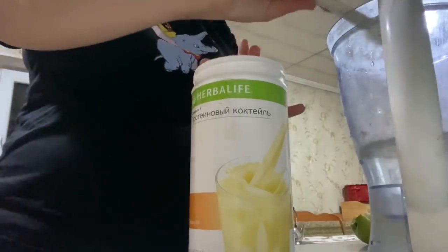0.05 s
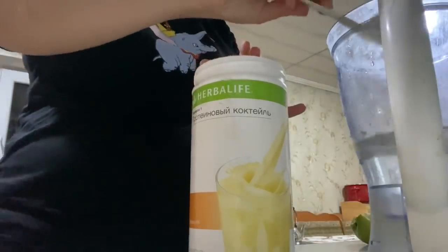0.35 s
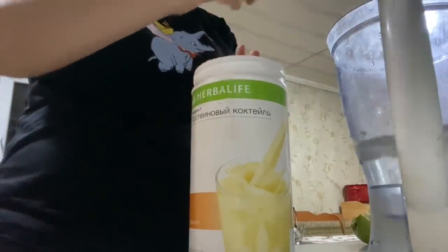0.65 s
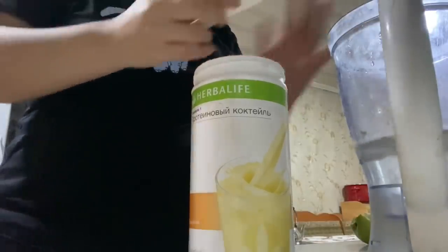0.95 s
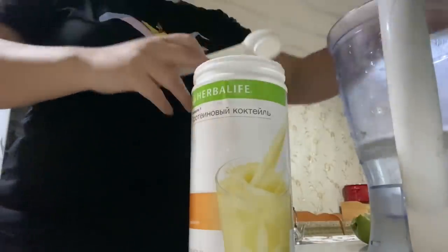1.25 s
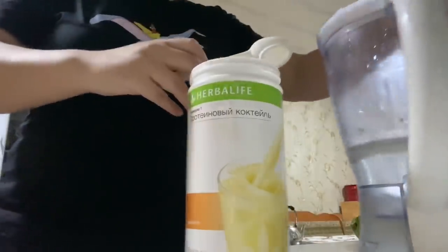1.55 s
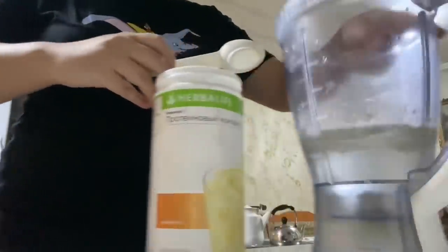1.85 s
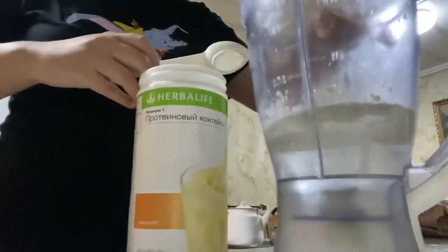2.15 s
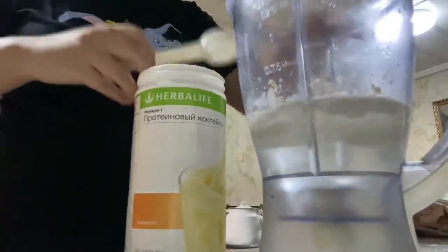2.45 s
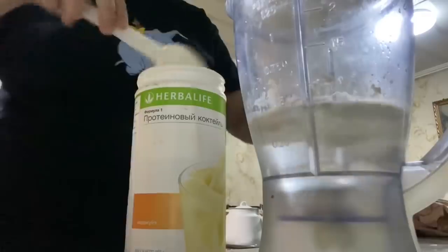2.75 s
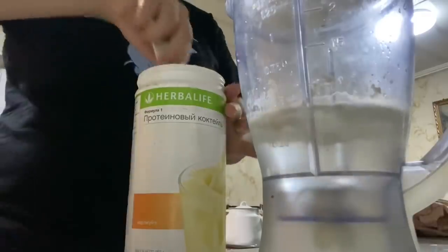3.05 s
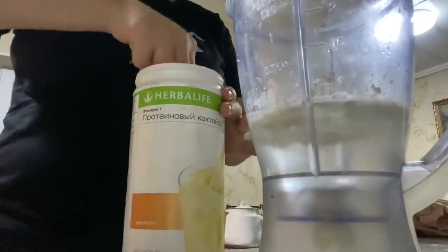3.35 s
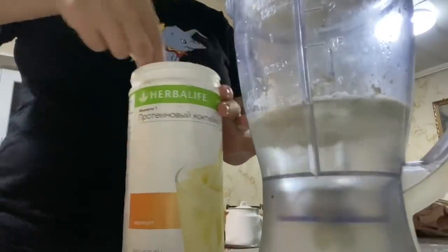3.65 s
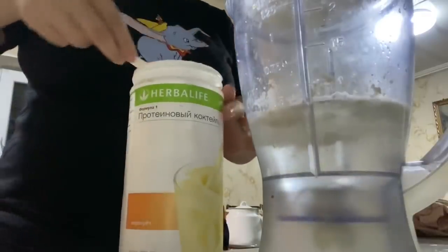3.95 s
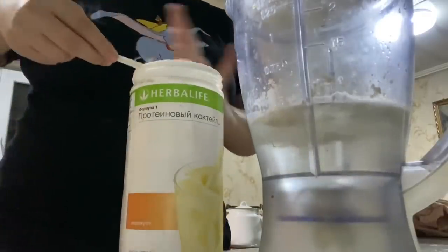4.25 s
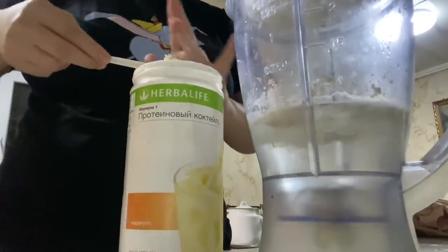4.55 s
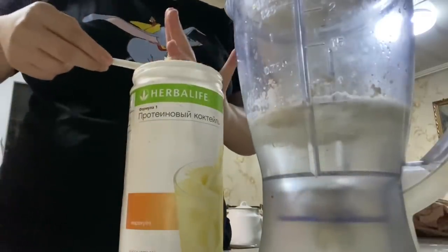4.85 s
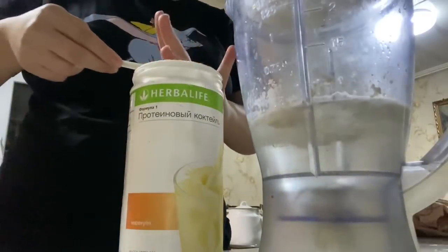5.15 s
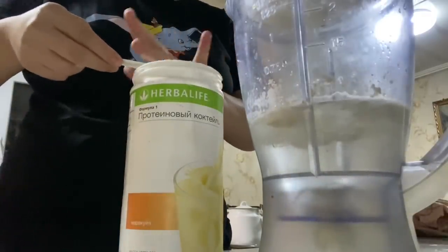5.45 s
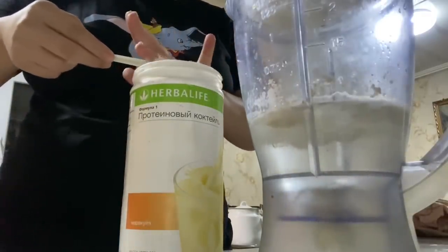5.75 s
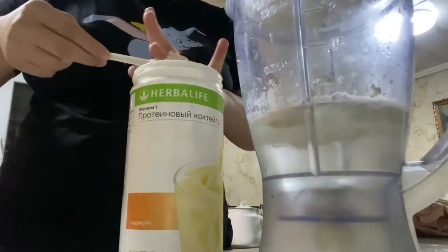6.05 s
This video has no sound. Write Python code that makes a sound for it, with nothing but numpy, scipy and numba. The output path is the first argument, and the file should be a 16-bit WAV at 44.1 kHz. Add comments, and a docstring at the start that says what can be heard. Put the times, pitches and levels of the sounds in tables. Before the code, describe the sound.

A low appliance hum and soft room noise run throughout in a small kitchen, with the microphone close by. Right at the start a plastic scoop taps twice on a blender jug, then scrapes lightly along a rim. A nudged tub judders briefly from about 0.6 to 1 second, with soft finger rubs on plastic. At 1.3 seconds a hand knocks loudly against the jug, and the blender slides over the table until 2.4, rumbling and rasping on grit with a couple of smaller knocks. Around 2.7 and 3 seconds the scoop knocks and clacks inside the hollow tub, then digs through crunching powder, rubbing the wall. At 3.7 the tub thumps down heavily, shaking the table. From 4 seconds it is much quieter: faint finger rubs, small ticks around 4.5 and 5, and light scrapes of the scoop's edge on the rim until about 6 seconds.

```python
"""Making a shake at a kitchen table, a microphone standing close by. An appliance hums in a small room.
Fingers rub plastic, a scoop taps twice on a blender jug and scrapes a rim, and a nudged tub judders.
The blender is grasped and slid nearer, rasping over grit. The scoop knocks into the tub and digs through
crunching powder, then the tub thumps down. Last, a finger levels the scoop and its edge grazes a rim.
Every blow rings the thing it hits and shakes the table."""
import sys
import numpy as np
from scipy import signal
from scipy.fft import rfft, irfft, next_fast_len
from scipy.io import wavfile
from numba import njit

SR = 44100
rng = np.random.default_rng(int(sys.argv[2]) if len(sys.argv) > 2 else 0)


def wav_out(sig):
    """Save sig, one row per channel (or a flat mono array), as 16-bit PCM at SR to the path in sys.argv[1]."""
    wavfile.write(sys.argv[1], SR, np.round(np.clip(np.atleast_2d(sig).T, -1, 1) * 32767).astype(np.int16))


N = 269509
TIME, PADDED = np.arange(N) / SR, next_fast_len(N)

# room tone: pitch_hz, density_db
AIR_TONE = [(15, -49.5), (25, -8), (69, -11), (90, -10), (224, -16), (301, -9), (373, -10.5), (438, -23.5),
            (540, -24.5), (1210, -38), (1500, -43), (2020, -41.5), (2780, -46), (15000, -55)]
# appliance hum: pitch_hz, level_db
HUM_PARTIALS = [(99.5, -62.5), (308, -67)]

# fingers and handle rubbing the outside of the plastic: start_s, length_s, level_db
FINGER_RUBS = [(-.02, 0.048, -48), (0.409, 0.26, -62), (0.984, 0.062, -54), (1.26, 0.37, -65),
               (3.215, 0.042, -54), (3.982, 0.11, -59), (4.133, 0.38, -77), (4.986, 0.037, -61.5),
               (5.987, 0.051, -53.5)]
# the scoop's edge drawn along a rim: start_s, length_s, level_db, brightness_hz
EDGE_SCRAPES = [(0.377, 0.24, -54.5, 15000), (0.836, 0.12, -69, 15000), (5.068, 0.035, -55, 4500),
                (5.636, 0.21, -64, 14000), (5.795, 0.15, -61, 7800), (5.999, .12, -56.5, 5000)]
# hits: start_s, level_db, brightness_hz, table_thud_db
RIM_TAPS = [(.1375, -27.5, 8850, -28.5), (.2775, -21, 8400, -27.5)]
SCOOP_CLICKS = [(2.783, -46.5, 6000, -59), (.644, -50, 12000, -71), (2.769, -45, 5850, -53),
                (2.9925, -43, 11700, -56), (3.003, -38, 12000, -45), (3.7255, -25.5, 15000, -54),
                (4.087, -56, 6000, -64)]
JUG_KNOCKS = [(1.3228, -10.5, 905, -52), (1.3265, -6, 963, -26), (1.341, -26, 499, -27),
              (1.849, -16.5, 1100, -57), (2.194, -23, 3000, -61.5), (2.427, -35.5, 5050, -33.5)]
TUB_KNOCKS = [(2.7428, -13, 3480, -35), (2.7565, -27, 5000, -30), (2.7825, -34, 4950, -35),
              (3.7278, -7.5, 280, -2.5)]
BOWL_DROPS = [(2.9928, -11.5, 4930, -52), (3.172, -46, 500, -31), (4.516, -53, 4010, -74),
              (4.9996, -53, 1496, -67), (6.001, -61, 1500, -59)]
# speed curve of the sliding blender: time_s, speed_db
SLIDE_SPEED = [(1.2, -94), (1.237, -67), (1.33, -62.5), (1.39, -54), (1.468, -42.5), (1.525, -45.5),
               (1.66, -37.5), (1.76, -43), (2.025, -35), (2.2, -40), (2.338, -51), (2.428, -73.5),
               (2.499, -106)]
# coarse grains crushed under a blender foot: start_s, length_s, level_db
FOOT_CRUNCHES = [(1.63, 0.0098, -43.5), (1.68, 0.014, -45.5), (2.405, 0.013, -57.5)]
# the scoop moving in the tub: start_s, length_s, powder_db, crunch_hz, wall_rub_db
DIGS = [(2.552, 0.08, -66.5, 12300, -72), (2.726, 0.046, -72, 6760, -46.5),
        (2.805, 0.295, -83, 2410, -57.5), (2.977, 0.062, -41.5, 4400, -43.5),
        (3.055, 0.12, -71, 3540, -58.5), (3.135, 0.45, -72.5, 2060, -55),
        (3.359, 0.11, -54.5, 12500, -69.5), (3.467, 0.084, -49.5, 2770, -47.5),
        (3.601, 0.15, -49, 2050, -49), (3.704, 0.1, -43.5, 4500, -46)]

# ringing modes of each struck thing: pitch_hz, level_db, t60_s
TABLE_MODES = [(64.4, -2, 0.38), (74.8, 2, 0.25), (132.4, 2.5, 0.19), (208.5, -8, 0.19), (313, -6, 0.077)]
RIM_MODES = [(160, -5.5, 0.23), (322.8, 2, 0.22), (898, 13.5, 0.055), (1674, -1.5, 0.07), (2467, 5.5, 0.05),
             (3294, -1, 0.057), (3300, -4, 0.19), (4410, -22.5, 0.1)]
SCOOP_MODES = [(4740, -14, 0.025), (6920, -1.5, 0.021), (8140, 3, 0.016), (11900, 2.5, 0.011)]
JUG_MODES = [(126, 1, 0.1), (214, -4.5, 0.11), (316, 0, 0.055), (360, 2, 0.11), (600, 0.5, 0.099),
             (877, -2.5, 0.051)]
TUB_MODES = [(388, 11.5, 0.047), (455, 6, 0.057), (671, -16.5, 0.0306), (1083, 8, 0.025),
             (1990, -6.5, 0.025)]
BOWL_MODES = [(525, -2, 0.051), (619, 4, 0.036), (1018, 1.5, 0.016), (1810, -9, 0.024), (2160, -9.5, 0.03),
              (3200, -10, 0.016)]
# the crowd of weaker modes between them, played as noise: pitch_hz, density_db
RIM_CROWD = [(60, 4), (350, 6), (600, -2), (1350, -15.5), (3100, 4), (4500, -5.5), (6000, -10),
             (14000, -26.5)]
SCOOP_CROWD = [(300, 12), (2000, -0.5), (6000, -5.5), (8300, 3), (14000, -14.5)]
JUG_CROWD = [(60, -26.5), (150, 19.5), (600, 18), (1200, -7), (2200, 9.5), (14000, -12)]
TUB_CROWD = [(40, -14), (250, 5.5), (550, 14), (1100, -1), (1450, -15), (2200, -8), (5000, -30.5),
             (14000, -45)]

# tone colour of each friction layer: pitch_hz, density_db
FINGER_TONE = [(200, 4.5), (550, 2), (900, 3), (1550, -7), (2300, -7.5), (3200, -15), (5500, -22),
               (14000, -41.5)]
SCRAPE_TONE = [(600, 10.5), (1200, -7.5), (3400, -4.5), (5700, -19.5), (7000, -9), (12000, -17),
               (15000, -11)]
JUDDER_TONE = [(40, -4), (100, 3), (132, 12), (170, -4), (200, -5), (250, -12.5), (620, -19), (900, -54),
               (3000, -69)]
RUMBLE_TONE = [(40, -19.5), (65, -4), (200, -3), (340, -4), (700, -28)]
CHATTER_TONE = [(200, -25.5), (400, -7), (650, -0.5), (900, -6.5), (1200, -9), (1500, -18), (3000, -33.5)]
RASP_TONE = [(700, -20), (1500, -6), (2000, -1), (3800, -1), (5000, -3), (7000, -69)]
GRIT_TONE = [(2500, -13), (4700, 2.5), (6000, 1.5), (7200, 0.5), (9000, -3), (12000, -9.5), (15500, -13.5)]
POWDER_TONE = [(800, -14), (2000, 5.5), (3500, 3.5), (4800, 2), (6200, 0), (8300, -0.5), (13000, -8.5),
               (15500, -13)]
WALL_TONE = [(100, -19), (300, 4), (520, 3), (750, -0.5), (1100, -6.5), (1500, -14.5), (2200, -14.5),
             (3200, -16.5), (5000, -24), (10000, -81)]
PUSH_TONE = [(30, -27.5), (48, 5.5), (70, 8), (105, -1.5), (155, 2), (300, -23), (900, -55)]
# resonances of rubbed things: pitch_hz, width_hz, lift_db
FINGER_PEAKS = [(1200, 85, 2.3), (2245, 150, 4)]
EDGE_PEAKS = [(2170, 41, 8.7), (2965, 60, 7.1), (4010, 160, 10.5), (4950, 190, 13.3)]
BASE_PEAKS = [(607, 9.5, 7), (716, 22, 7.8), (1168, 50, 7.7)]
BACK_FEET_PEAKS = [(3420, 120, 6), (6060, 61, 7.4)]
FRONT_FEET_PEAKS = [(1270, 23, 10.5), (1830, 79, 7.1), (2300, 45, 6.7), (4900, 250, 3)]
WALL_PEAKS = [(515, 77, 5.5)]

# the room's reverb time: pitch_hz, t60_s
ROOM_DECAY = [(60, 0.58), (300, 0.41), (700, 0.2), (2000, 0.74), (5000, 0.077), (14000, 0.068)]
# balance of the microphone's two ports: pitch_hz, left_minus_right_db
PORT_BALANCE = [(60, -3.5), (200, -6.5), (380, -6), (700, -3.5), (1290, -1), (15000, 1)]
# how far both ports hear the same wave: pitch_hz, likeness_0_to_1
PORT_LIKENESS = [(3000, 0.01), (6200, 0.17), (7600, 1)]


def amp(db):
    """Decibels to gain."""
    return np.exp(np.asarray(db) * np.log(10) / 20)


def unit(x):
    """Scale to rms 1."""
    return x / np.sqrt(np.mean(x ** 2))


def pan(db):
    """Gains of the two ports for a left-minus-right level."""
    return amp(np.outer([1, -1], db) / 2)


def freqs(x):
    """Frequency of each Fourier bin of x."""
    return np.maximum(np.fft.rfftfreq(x.shape[-1], 1 / SR), 1)


def at(points, hz):
    """Read (Hz, value) points on a log-frequency axis."""
    point_hz, value = np.transpose(points)
    return np.interp(np.log(hz), np.log(point_hz), value)


def colour(x, tone):
    """EQ to a tone curve, rolled off below hearing; rms 1."""
    hz = freqs(x)
    return unit(irfft(rfft(x) * amp(at(tone, hz)) * hz ** 2 / (hz ** 2 + 20 ** 2), x.shape[-1]))


def soften(x, brightness_hz, order):
    """A softer contact takes off the treble."""
    return signal.lfilter(*signal.butter(order, brightness_hz, fs=SR), x)


def noise(size, alike_hz=260):
    """Noise at two microphone ports: alike in the bass, unrelated in the treble."""
    mid, side = rfft(rng.standard_normal((2, size)))
    alike = 0.68 / (1 + (np.fft.rfftfreq(size, 1 / SR) / alike_hz) ** 2)
    ports = mid * np.sqrt(1 + alike) + np.outer([1, -1], side * np.sqrt(1 - alike))
    return irfft(ports, size) / np.sqrt(2)


def walk(rate_hz):
    """Smooth random modulation with a spread near 1."""
    knots = rng.standard_normal(N // 20)
    return 1.1 * np.interp(TIME * rate_hz, np.arange(len(knots)), knots)


def stroke(start, length, attack_s, release_s):
    """Envelope of one movement: it swells smoothly, holds, then falls 60 dB in the release time."""
    speed = np.zeros(N)
    moving = (TIME > start) & (TIME < start + length + 2 * release_s)
    t = TIME[moving] - start
    swell = np.sin(np.minimum(t / attack_s, 1) * np.pi / 2) ** 2
    speed[moving] = swell * amp(-60 * np.maximum(t - length, 0) / release_s)
    return speed


def friction(tone, slip_db, grain_db):
    """Dense tiny catches, bunched by uneven slipping, ringing a body."""
    catches = noise(PADDED)
    catches[:, :N] *= amp(slip_db * walk(60) + grain_db * walk(1500))
    return colour(catches, tone)[:, :N]


@njit
def band_pass(x, hz, width_hz):
    """A resonance whose centre may move every sample; gain 1 at the centre."""
    y = np.empty_like(x)
    for port in range(len(x)):
        band, low = 0., 0.
        for i in range(len(hz)):
            tuning, damping = np.tan(np.pi * hz[i] / SR), width_hz / hz[i]
            swing = (band + tuning * (x[port, i] - low)) / (1 + tuning * (tuning + damping))
            band, low = 2 * swing - band, low + 2 * tuning * swing
            y[port, i] = damping * swing
    return y


def resonate(x, peaks, sway_db, drift, moves_per_s=11):
    """Add resonances that swell and shift in pitch as the point of contact moves."""
    out = x = np.ascontiguousarray(x)
    for hz, width_hz, lift_db in peaks:
        centre_hz = hz * (1 + drift * walk(moves_per_s))
        boost = amp(lift_db + sway_db * walk(moves_per_s)) - 1
        out = out + boost * band_pass(x, centre_hz, float(width_hz))
    return out


def ring(modes, t, rise_cycles, lag_s):
    """Damped modes that build up quickly and reach the left port a little later."""
    t = np.maximum(t - np.array([[lag_s], [0]]), 0)
    out = 0
    for hz, db, t60 in modes:
        rise = 1 - np.exp(-t * hz / rise_cycles)
        out = out + amp(db - 60 * t / t60) * np.sin(2 * np.pi * hz * t) * rise
    return out / np.sqrt(2 * sum(amp(db) ** 2 for _, db, _ in modes))


def strike(hits, modes, crowd, crowd_db, crowd_t60, rise_cycles, lag_s, order=1, pan_db=0):
    """Each hit rings an object's modes over a burst of noise and thuds the table."""
    size = SR // 2
    out, t = np.zeros((2, N + size)), np.arange(size) / SR
    thud = ring(TABLE_MODES, t, rise_cycles=0.53, lag_s=0.00084)
    tones = ring(modes, t, rise_cycles, lag_s)
    for start_s, db, brightness_hz, thud_db in hits:
        burst = colour(noise(size, alike_hz=702), crowd) * amp(crowd_db - 60 * t / crowd_t60)
        body = soften(tones + burst, brightness_hz, order)
        start = int(start_s * SR)
        out[:, start:start + size] += amp(db) * pan(pan_db) * body + amp(thud_db) * thud
    return out[:, :N]


def kitchen(air_db=-57):
    """A bed of steady air noise and the wavering hum of an appliance."""
    hum = 0
    for hz, db in HUM_PARTIALS:
        level = np.sqrt(2) * amp(db + 1.4 * walk(8.6))
        cycles = np.cumsum(hz * (1 + 0.0066 * walk(11))) / SR
        hum = hum + level * np.sin(2 * np.pi * cycles)
    return amp(air_db) * colour(noise(PADDED), AIR_TONE)[:, :N] + hum


def finger_rubs():
    """Fingers catch and slip on the plastic in soft, dull strokes."""
    skin = friction(FINGER_TONE, slip_db=2.5, grain_db=3)
    rub = resonate(skin, FINGER_PEAKS, sway_db=1.5, drift=.03)
    return rub * sum(amp(db) * stroke(start, length, attack_s=0.018, release_s=0.33)
                     for start, length, db in FINGER_RUBS)


def rim_taps():
    """The scoop taps the jug's rim, which rings on briefly."""
    return strike(RIM_TAPS, RIM_MODES, RIM_CROWD,
                  crowd_db=-7.5, crowd_t60=0.17, rise_cycles=1, lag_s=.00004)


def edge_scrapes():
    """The scoop's edge rings as it is drawn along a rim; some scrapes are bright, others dull."""
    catches = friction(SCRAPE_TONE, slip_db=1.5, grain_db=2.5)
    edge = resonate(catches, EDGE_PEAKS, sway_db=2, drift=.015)
    out = 0
    for start, length, db, brightness_hz in EDGE_SCRAPES:
        draw = stroke(start, length, attack_s=0.061, release_s=0.15)
        out = out + amp(db) * draw * soften(edge, brightness_hz, order=2)
    return out


def tub_judder(start_s=0.62, length_s=0.36, slip_hz=160, sag_hz_per_s=170, db=-33.5, fade_db_per_s=40):
    """The nudged tub's foot sticks and slips in a quick ragged train that slows and fades."""
    since = np.clip(TIME - start_s, 0, length_s)
    rate_hz = (slip_hz - sag_hz_per_s * since) * np.exp(.25 * walk(130))
    slip_count = np.floor(np.cumsum(rate_hz) / SR)
    slips = np.diff(slip_count, prepend=0) * amp(3 * walk(120))
    fade = amp(db - fade_db_per_s * since)
    nudge = stroke(start_s, length_s, attack_s=0.085, release_s=0.2)
    return colour(unit(slips) + noise(PADDED)[:, :N], JUDDER_TONE) * fade * nudge


def scoop_clicks():
    """The scoop's high modes die at once: small, bright plastic ticks."""
    return strike(SCOOP_CLICKS, SCOOP_MODES, SCOOP_CROWD,
                  crowd_db=-0.5, crowd_t60=0.04, rise_cycles=0.42, lag_s=.00001)


def blender_slide(layer_db=-38.5, rasp_db=-40, full_speed_db=-35, nearing_db_per_s=6.5, middle_s=1.78,
                  turn_middle_s=1.85, turn_length_s=0.31):
    """The base drags over the table: its feet rumble, chatter, rasp and hiss on grit as speed rises."""
    speed = amp(np.interp(TIME, *np.transpose(SLIDE_SPEED), left=-200, right=-200) - full_speed_db)
    nearing_db = nearing_db_per_s * (np.minimum(TIME, SLIDE_SPEED[-1][0]) - middle_s)
    rumble = friction(RUMBLE_TONE, slip_db=2, grain_db=0) * amp(layer_db)
    chatter = friction(CHATTER_TONE, slip_db=2.5, grain_db=5.5) * amp(layer_db + nearing_db)
    # grit follows the speed in full; body and rasp grow more slowly
    body = (rumble + chatter) * speed ** 0.59 * pan(-1)
    crunch = sum(amp(db) * stroke(start, length, attack_s=0.0094, release_s=0.15)
                 for start, length, db in FOOT_CRUNCHES)
    rasp = friction(RASP_TONE, slip_db=1.8, grain_db=4.2) * np.hypot(speed ** 0.79 * amp(rasp_db), crunch)
    grit = friction(GRIT_TONE, slip_db=1, grain_db=1.5) * speed * amp(layer_db)
    base = resonate(body + rasp + grit, BASE_PEAKS, sway_db=2, drift=.025)
    # the base turns as it is pulled: its weight crossfades from the back feet to the front
    back = resonate(base, BACK_FEET_PEAKS, sway_db=2.5, drift=.015)
    front = resonate(base, FRONT_FEET_PEAKS, sway_db=2.5, drift=.015)
    turned = np.clip(.5 + (TIME - turn_middle_s) / turn_length_s, 0, 1)
    return (1 - turned) * back + turned * front


def jug_knocks():
    """A hand bumps the jug and wakes its low modes."""
    return strike(JUG_KNOCKS, JUG_MODES, JUG_CROWD,
                  crowd_db=-10, crowd_t60=0.042, rise_cycles=0.99, lag_s=0.00042, order=2)


def scooping(crunch_q=3.3, crunch_lift_db=9.5, push_lift_db=4):
    """The scoop rubs the hollow tub, packed powder crunches at each dig's pitch, and the push rumbles."""
    grains = friction(POWDER_TONE, slip_db=2.4, grain_db=4.4)
    powder = wall_gain = push_gain = 0
    for start, length, powder_db, crunch_hz, wall_db in DIGS:
        swell_s = 0.61 * length
        dig = stroke(start, length, swell_s, release_s=0.21)
        crunch = signal.lfilter(*signal.iirpeak(crunch_hz, crunch_q, fs=SR), grains)
        powder = powder + amp(powder_db) * dig * unit(grains + (amp(crunch_lift_db) - 1) * crunch)
        wall_gain += amp(wall_db) * dig
        push_gain += amp(wall_db + push_lift_db) * stroke(start, length, swell_s, release_s=0.32)
    rub = friction(WALL_TONE, slip_db=2.5, grain_db=2)
    wall = resonate(rub, WALL_PEAKS, sway_db=1.5, drift=.04)
    push = friction(PUSH_TONE, slip_db=2.5, grain_db=1.5)
    return powder + wall * wall_gain + push * push_gain


def tub_knocks():
    """The tub gives short, hollow knocks, then thumps down on the table."""
    return strike(TUB_KNOCKS, TUB_MODES, TUB_CROWD,
                  crowd_db=-9.5, crowd_t60=0.074, rise_cycles=0.22, lag_s=.00005, pan_db=1.5)


def bowl_drops():
    """The scoop's bowl clacks as it meets powder and rim; one soft, dull thud among them is a hand grasping the
    tub."""
    return strike(BOWL_DROPS, BOWL_MODES, SCOOP_CROWD,
                  crowd_db=-17.5, crowd_t60=0.039, rise_cycles=0.9, lag_s=.00003)


def room(x, early_db, early_t60, tail_db=-15.5):
    """Quick reflections from the table and things on it, then the room's tail, octave by octave."""
    t = np.arange(SR) / SR
    wash = noise(SR)
    octave = np.clip(np.log2(freqs(wash) / 60), 0, 8)
    tail = 0
    for k in range(9):
        band = irfft(rfft(wash) * np.maximum(1 - abs(octave - k), 0), SR)
        tail = tail + band * amp(-60 * t / at(ROOM_DECAY, 60 * 2 ** k))
    tail = unit(tail * np.clip(t / 0.0047, 0, 1))
    early = unit(noise(SR) * amp(-60 * t / early_t60) * (t > .003))
    response = (amp(tail_db) * tail + amp(early_db) * early) / np.sqrt(SR)
    return x + signal.fftconvolve(x, response, axes=1)[:, :N]


def scene():
    """Hits and rubbing, each with its own room reflections, over the kitchen bed."""
    hits = rim_taps() + scoop_clicks() + jug_knocks() + tub_knocks() + bowl_drops()
    rubbing = finger_rubs() + edge_scrapes() + tub_judder() + blender_slide() + scooping()
    hits = room(hits, early_db=-11, early_t60=0.21)
    rubbing = room(rubbing, early_db=-2, early_t60=0.082)
    return kitchen() + hits + rubbing


def record(dry, lag_s=.000204, in_phase_hz=7950, locking=0.15, low_cut_hz=44.5, high_cut_hz=15600):
    """The right port hears more low mids and gets the treble later; deep bass and the top are cut."""
    hz = freqs(np.zeros(PADDED))
    left, right = rfft(dry, PADDED)
    alike = at(PORT_LIKENESS, hz)
    phase = 2 * np.pi * (hz - in_phase_hz) * lag_s
    phase -= locking * np.sin(2 * phase)  # pulls the ports towards in step or out of step
    right = np.sqrt(1 - alike ** 2) * right + alike * left * np.exp(-1j * phase)
    heard = irfft(np.array([left, right]) * pan(at(PORT_BALANCE, hz)), PADDED)[:, :N]
    heard = signal.sosfilt(signal.butter(2, low_cut_hz, "high", fs=SR, output="sos"), heard)
    return signal.sosfilt(signal.ellip(8, .2, 70, high_cut_hz, fs=SR, output="sos"), heard)


dry = scene()
out = record(dry)
wav_out(out)
```